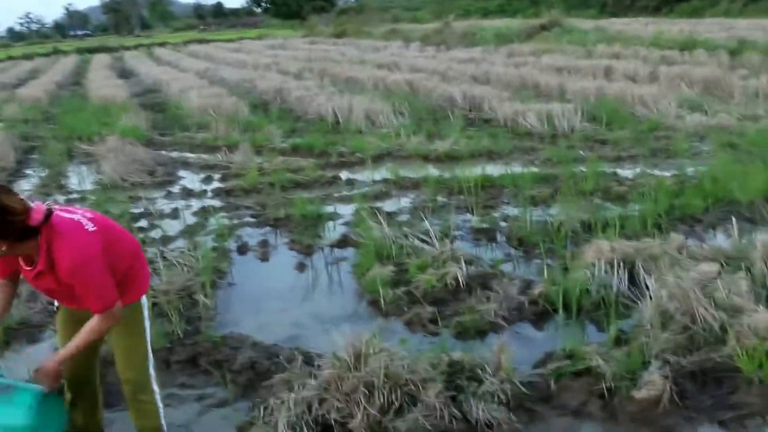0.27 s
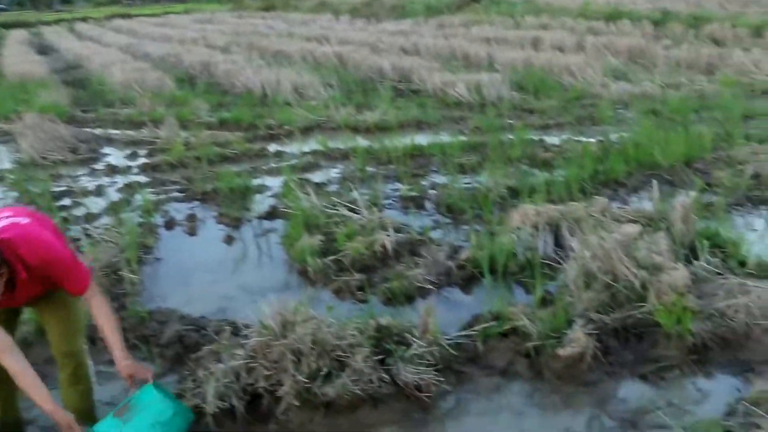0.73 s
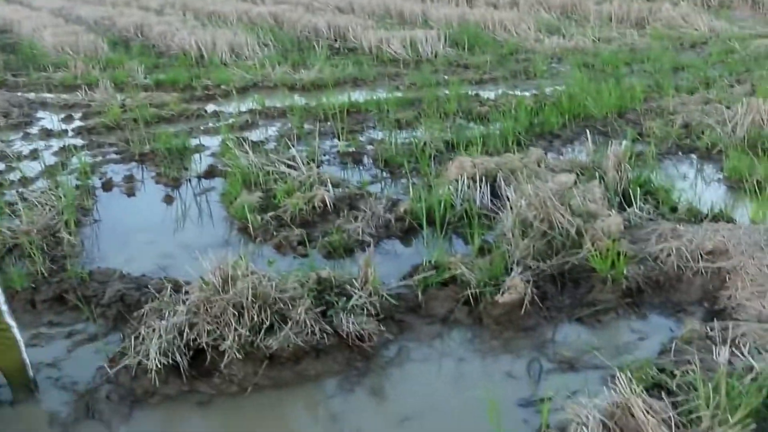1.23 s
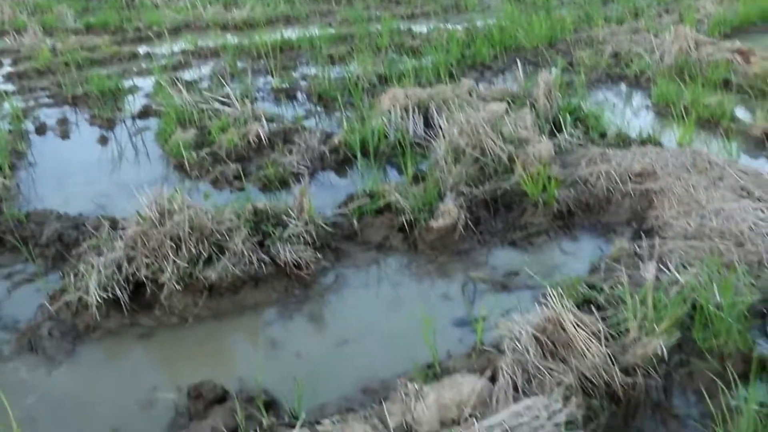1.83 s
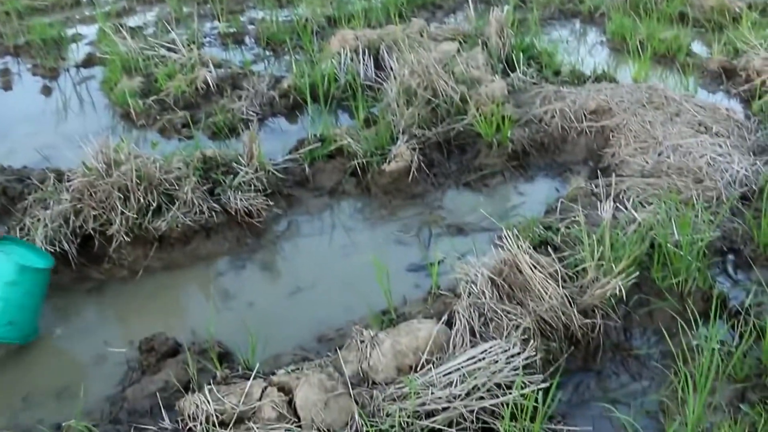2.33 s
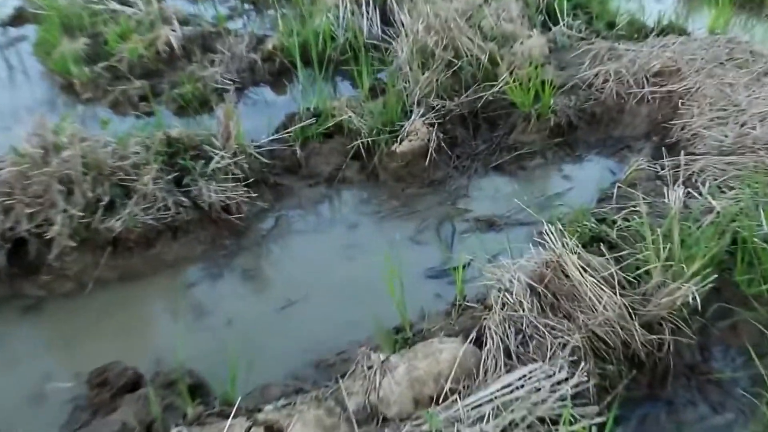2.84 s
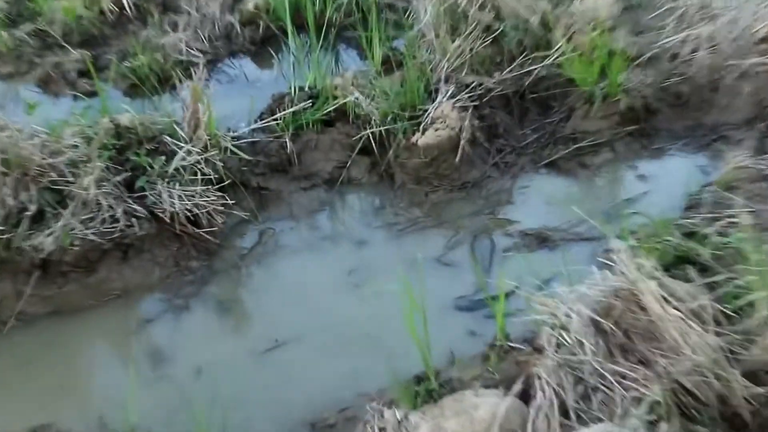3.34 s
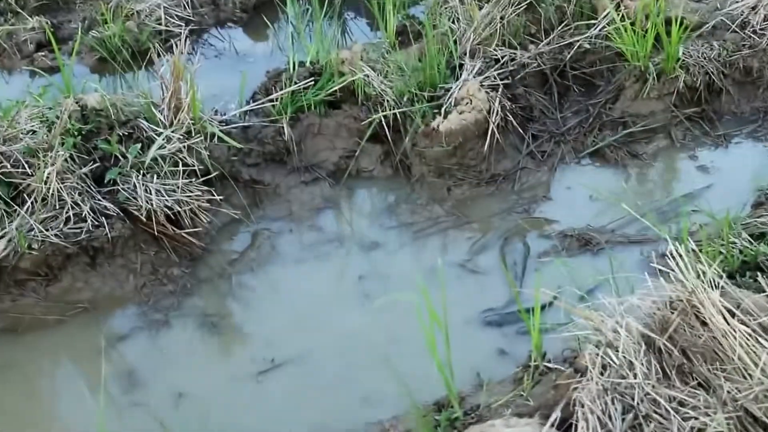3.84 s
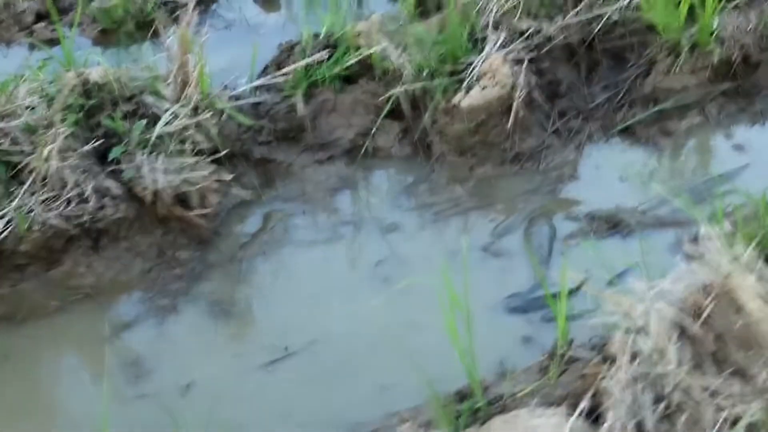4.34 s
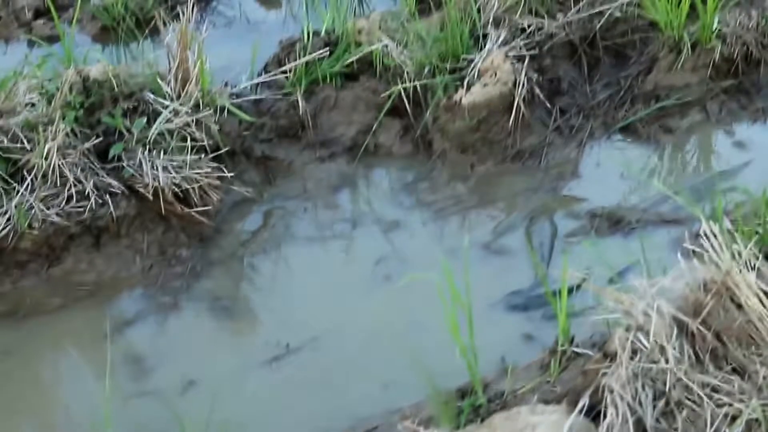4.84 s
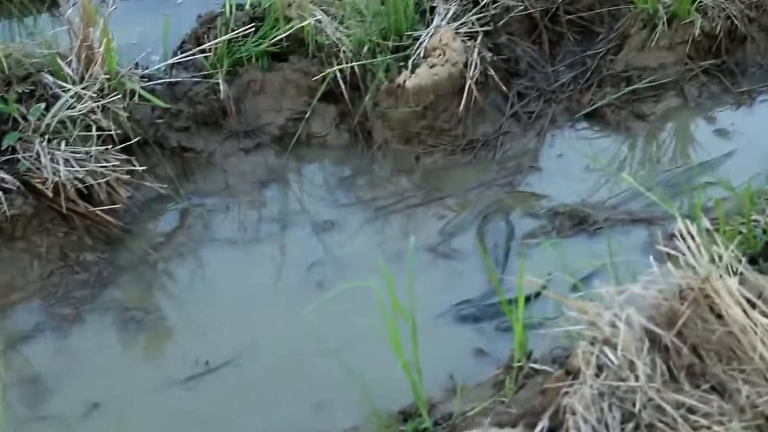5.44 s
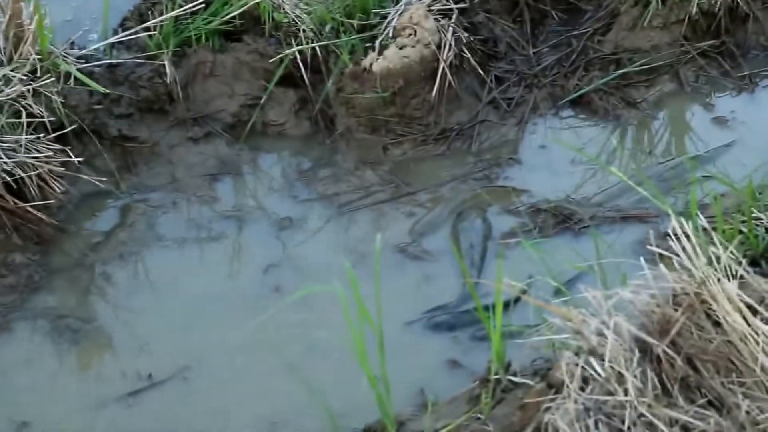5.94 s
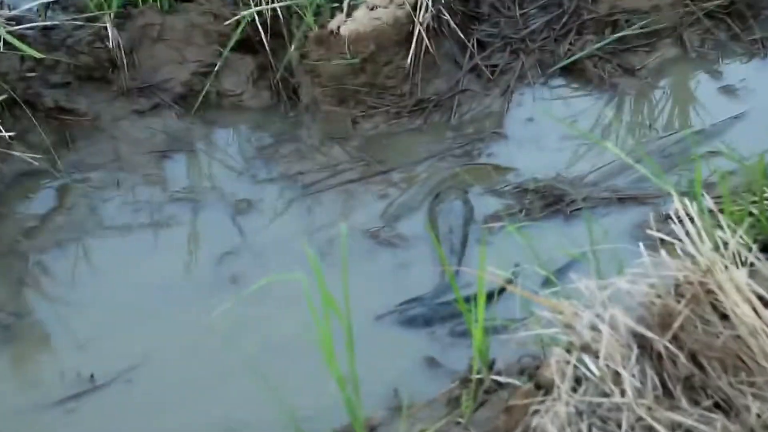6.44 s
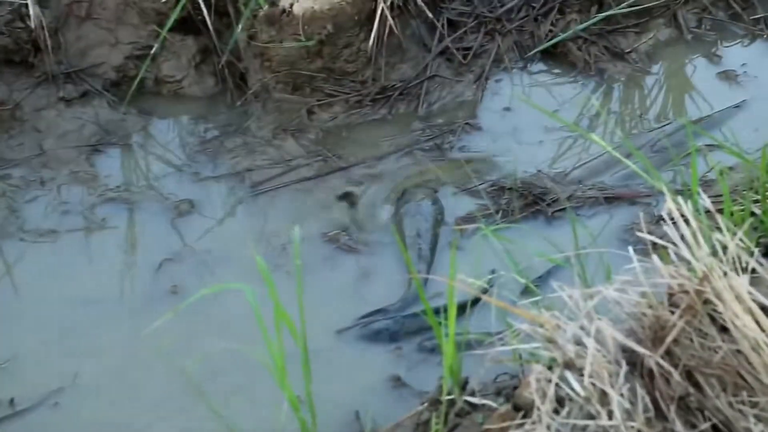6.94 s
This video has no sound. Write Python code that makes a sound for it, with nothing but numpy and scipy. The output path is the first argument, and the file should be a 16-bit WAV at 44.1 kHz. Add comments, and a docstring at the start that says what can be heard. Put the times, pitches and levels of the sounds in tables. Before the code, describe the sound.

Someone bails a shallow muddy pool with a plastic bucket, slightly left of a hand-held microphone in an open field. Hollow knocks and gurgling scoops alternate with flung water landing in splashes about every 1.8 seconds, followed by drips and bubbles. A faint hiss lies beneath. From about three seconds wind thumps grow into strong low rumbling, mostly on the right.

```python
"""A flooded field is bailed with a plastic bucket, a little to the left of a hand-held camera.
A knock opens the scene; a bucketful lands in a splash of noise bursts and bubbles, and trickles off.
The bucket, a bank of damped modes, knocks into the pool, gulps full and flings again about every 1.8 s.
Over a faint hiss a breeze rises from about 3 s: noisy eddies buffet the microphone ports, mostly the right."""
import sys
import numpy as np
from scipy import signal
from scipy.fft import rfft, irfft, next_fast_len
from scipy.io import wavfile
from scipy.ndimage import uniform_filter1d, map_coordinates

SR = 44100
rng = np.random.default_rng(int(sys.argv[2]) if len(sys.argv) > 2 else 0)


def unload_audio(sound):
    """Save the sound as a 16-bit wav file, at the path given as the first command line argument."""
    columns = np.transpose(np.atleast_2d(sound))
    # keep every value between -1 and 1, then stretch to whole-number steps
    steps = np.round(np.clip(columns, -1, 1) * 32767)
    wavfile.write(sys.argv[1], SR, steps.astype(np.int16))


N = 316638

# Steady hiss of field and microphone: f/Hz, relative level/dB
AIR_SPECTRUM = [(30, -5), (150, 9.5), (400, -3), (750, -5.5), (1000, -3), (1250, -16), (3000, -13),
                (5800, -12.5), (7000, -14.5), (8300, -2), (9200, -12), (10200, -9.5), (11300, -27),
                (15500, -43)]
# Faint thin whine, before its wobble: t/s, f/Hz, level/dB
WHINE_PATH = [(0, 1015, -88), (2.8, 1006, -57.5), (3.5, 1009, -70), (5.5, 1064, -50), (6.1, 1053, -64),
              (7.18, 1078, -55.5)]
# The breeze rises; left is before sheltering: t/s, left level/dB, right level/dB
BREEZE_LEVELS = [(0, -72, -61), (2.7, -68, -60), (3.1, -53, -44.5), (4.1, -55, -43.5), (5.4, -43, -26.5),
                 (6.05, -37.5, -37), (7.18, -36.5, -27.5)]
# Gusts, and at 2.557 s the low thud of a bucket knock; t being the start of full strength: t/s, length/s, left
# level/dB, right level/dB
GUSTS_AND_THUD = [(0.086, 0.23, -60, -53), (2.557, 0.033, -49, -53), (2.962, 0.091, -48, -41),
                  (3.51, 0.11, -66, -42), (4.242, 0.11, -65, -38.5), (4.468, 0.29, -44, -35),
                  (4.896, 0.12, -33.5, -26), (5.247, 0.4, -53, -19), (5.693, 0.251, -50, -22.5),
                  (6.256, 0.46, -37.5, -23), (6.75, 0.046, -23, -39), (6.858, 0.3, -32, -29.5)]
# Wind buffeting at a port: f/Hz, relative level/dB
BUFFET_SPECTRUM = [(15, -57), (30, -14.5), (60, 0), (110, 2), (170, -2), (250, -9.5), (340, -14),
                   (500, -26.5), (800, -36.5), (2000, -55), (6000, -93)]
# The hardest eddies on the right port: t/s, peak level/dB, f/Hz
EDDY_THUMPS = [(0.098, -29, 123), (2.978, -24, 165), (3.552, -19, 135), (3.572, -22.5, 168),
               (3.636, -21, 126), (3.897, -19, 101), (3.925, -19.5, 153), (4.27, -16.5, 178),
               (4.306, -15.5, 150), (4.348, -18.5, 95), (4.511, -15, 132), (4.62, -16.5, 156),
               (4.651, -18, 195), (5.126, -13, 209), (5.161, -7.5, 132), (5.185, -9, 196), (5.258, -7, 191),
               (5.292, -5.5, 166), (5.359, -4.5, 203), (5.515, -10.5, 190), (5.566, -5, 151),
               (5.61, -8, 210), (5.688, -7, 128), (5.83, -11.5, 210), (5.93, -12, 170), (5.99, -21, 150),
               (6.05, -23, 170), (6.198, -16, 303), (6.262, -12, 130), (6.31, -12.5, 210), (6.335, -14, 95),
               (6.381, -13, 260), (6.5, -8.5, 245), (6.511, -8.5, 131), (6.546, -16, 298),
               (6.585, -11, 240), (6.605, -12, 170), (6.662, -12, 260), (6.677, -11, 131),
               (6.731, -10.5, 170), (6.884, -20, 277), (6.94, -11, 140), (6.98, -10, 153),
               (7.039, -8.5, 125), (7.125, -8, 149)]
# Dry straw snaps: t/s, peak level/dB
STRAW_SNAPS = [(1.076, -44), (2.099, -24), (2.823, -30), (2.859, -30.5), (6.219, -37)]
# The pool never quite rests: t/s, slosh level/dB
POOL_LEVEL = [(0, -56), (2.6, -54), (4.6, -54.5), (6, -63), (7.18, -81)]
# Single bubbles, gulps and drips: t/s, peak level/dB, f/Hz, t60/s, upward glide/(octaves/s)
SINGLE_BUBBLES = [(.226, -26, 340, 0.027, 4), (.233, -32, 1200, 0.025, 5), (.28, -26, 458, 0.056, 6),
                  (.319, -23.5, 990, .04, 3), (.36, -32, 400, 0.047, 10), (0.53, -30.5, 903, 0.08, 12),
                  (1.043, -33, 274, 0.056, 4), (1.069, -33, 310, 0.038, 3), (1.134, -38, 197, 0.078, -3),
                  (1.141, -43, 2300, .03, 9), (1.174, -42, 4080, .016, 3), (1.186, -43, 402, 0.11, -4),
                  (1.235, -38, 2400, 0.035, 8), (1.287, -43, 890, 0.04, 19), (1.352, -33, 371, 0.043, 8),
                  (1.399, -28, 316, 0.045, 5), (1.44, -34, 151, 0.09, 0), (1.461, -34, 2320, 0.033, 4.5),
                  (1.508, -34, 134, 0.12, -1.5), (1.638, -32, 3900, 0.018, 3), (2.025, -39, 1120, 0.028, 5),
                  (2.106, -30, 1210, .03, 6), (2.865, -25, 266, 0.047, 6), (2.872, -36, 960, 0.044, -1.5),
                  (2.892, -32.5, 1900, .03, 25), (2.971, -26.5, 348, .045, 10),
                  (3.042, -18, 298, 0.045, 15), (3.047, -32, 993, 0.035, 8), (3.088, -32, 352, .035, 6),
                  (3.159, -31, 1950, 0.027, 26), (3.182, -46, 1020, 0.036, 3),
                  (3.212, -39.5, 1460, 0.034, 10), (3.287, -42, 2270, .06, 0), (3.312, -37, 778, 0.11, 10),
                  (3.44, -44, 1337, 0.063, 8.5), (3.616, -42, 1340, 0.028, 4),
                  (3.723, -22.5, 1060, .025, 13), (3.765, -25.5, 463, 0.047, 6),
                  (3.976, -40, 2040, .025, 7), (4.003, -41, 1020, 0.038, 11),
                  (4.072, -36, 1890, 0.027, 26.5), (4.436, -43, 930, 0.03, 3), (4.463, -36, 800, 0.039, 15),
                  (4.664, -40, 2170, .03, 12), (4.832, -36.5, 800, .06, 33), (4.84, -37, 1163, .04, 6),
                  (4.882, -42, 1210, 0.032, 21), (4.897, -36, 2800, 0.034, 1),
                  (4.921, -24.5, 340, 0.067, 2), (4.961, -33.5, 1360, 0.031, 12),
                  (5.092, -35.5, 820, 0.055, 14), (5.191, -39, 1090, 0.028, 23),
                  (5.494, -28, 1150, 0.045, 2), (5.822, -41, 690, 0.025, 17),
                  (6.189, -36.5, 897, 0.056, 10.5), (6.26, -40, 1750, 0.03, 7),
                  (6.305, -36, 1137, 0.032, 33), (6.329, -45, 1690, 0.036, 25),
                  (6.533, -34.5, 953, 0.041, 8), (6.625, -30.5, 1160, 0.047, -8.5),
                  (6.66, -31.5, 980, .08, 2.5), (6.678, -30, 932, 0.041, 11.5),
                  (6.718, -41, 1940, 0.04, 11), (6.789, -44, 863, 0.071, 7), (6.845, -44, 996, 0.032, 7),
                  (6.97, -36, 1144, 0.033, 18.5)]
# Bucket knocks, colours before a fixed offset: t/s, peak level/dB, low thud/dB, rim tick/dB
BUCKET_KNOCKS = [(0.078, -25.5, -25, -27), (0.926, -8, -17, -12), (1.225, -42.5, 1.5, 7),
                 (1.587, -14.5, -24.5, -13.5), (2.553, -15.5, -17, -16.5), (3.351, -18, -24.5, -20),
                 (4.412, -14.5, -16, -20), (5.151, -20, -19.5, -18), (5.35, -17.5, -19, -11)]
# Bucket modes, before the colour and scatter of each knock: f/Hz, level/dB, swell time/s
BUCKET_MODES = [(314, 0.5, 0.0054), (477, 2.5, 0.0029), (714, -15, 0.0015), (976, -10, 0.0066),
                (1240, -8, 0.0017), (2040, -24, 0.0019), (2067, -11, 0.0014), (2490, -8.5, 0.0023),
                (3490, -24, 0.0033), (4300, -3, 0.0008)]
# The bucket is drawn through the pool:
# t/s, rise/s, swell/dB, slosh level/dB, spray level/dB, gurgle level/dB, t60/s
SCOOP_EVENTS = [(.78, 0.55, 11, -52, -49, -48, 1.2), (1.24, 0.14, 18, -38, -47, -46.5, 0.48),
                (2.86, 0.18, 12, -36.5, -42, -44, 1.26), (4.661, 0.22, 7, -40.5, -49, -47, 0.78),
                (6.16, 0.78, 2.5, -49.5, -53.5, -49, 0.3)]
# A bucketful is flung out and lands: t/s, rise/s, slosh swell/dB, slosh level/dB, spray level/dB, t60/s,
# leading spray level/dB, stragglers' delay/s, stragglers' level/dB
THROW_EVENTS = [(0.197, 0.089, 20.5, -23, -29, 0.34, -52, 0.33, -43),
                (1.82, 0.11, 20, -28.5, -32, 0.39, -41, 0.2, -38),
                (3.685, 0.095, 25, -21.5, -29, 0.29, -41, 0.25, -45),
                (5.188, 0.425, 12.5, -30.5, -38.5, 0.17, -51.5, 0.095, -42.5),
                (7.095, 0.18, 7, -33.5, -34.5, 0.27, -77, .25, -42)]
# Sheets of water landing within a rush: t/s, half length/s, slosh level/dB, spray level/dB
WATER_SHEETS = [(0.23, 0.026, -31, -36.5), (1.977, 0.036, -32, -33.5), (3.729, 0.022, -30.5, -38),
                (3.81, 0.019, -36, -30.5), (4.904, 0.02, -57, -48), (5.31, 0.058, -35, -46),
                (5.559, 0.026, -38, -34), (5.607, 0.0072, -42, -32), (7.17, 0.012, -31, -39.5)]
# The heaviest slaps of water on water and mud: t/s, peak level/dB, centre f/Hz, t60/s
WATER_SLAPS = [(.202, -16.5, 1300, 0.055), (.226, -24, 2200, 0.06), (.277, -5, 3200, 0.033),
               (.298, -13, 935, 0.19), (.583, -27, 1400, .025), (.882, -21, 3700, .05),
               (1.078, -16.5, 2840, 0.048), (1.225, -18, 2240, 0.055), (1.332, -24.5, 990, 0.086),
               (1.375, -24, 1400, 0.055), (1.402, -19, 1070, 0.073), (1.5, -21, 1150, 0.07),
               (1.826, -18, 2600, 0.079), (1.873, -24, 1100, .07), (1.884, -16, 1200, 0.09),
               (1.948, -12.5, 1820, 0.16), (1.965, -12, 2300, 0.073), (1.982, -16.5, 1400, 0.073),
               (2.083, -27, 1240, 0.067), (2.116, -19, 1900, .04), (2.175, -22, 1270, 0.15),
               (2.392, -28.5, 2290, 0.06), (2.866, -21, 900, 0.084), (2.932, -26, 1010, 0.032),
               (3.039, -18, 1300, 0.063), (2.975, -26, 1500, .09), (3.094, -29, 800, .05),
               (3.16, -30, 2000, .03), (3.495, -21, 2910, 0.032), (3.605, -24, 1600, 0.029),
               (3.767, -6.5, 1180, 0.072), (3.778, -4.5, 1140, 0.064), (3.784, 1, 1180, 0.022),
               (3.797, -10, 1210, 0.047), (4.059, -24, 1330, 0.068), (4.465, -23, 895, 0.076),
               (4.722, -20.5, 2020, 0.04), (4.801, -22, 2500, 0.06), (4.884, -34, 1700, 0.05),
               (5.012, -25.5, 1430, 0.074), (5.291, -14, 1790, 0.058), (5.351, -15, 1310, 0.11),
               (5.425, -22, 750, 0.12), (5.481, -20, 720, 0.17), (5.514, -16, 750, 0.092),
               (5.555, -9, 2070, 0.093), (5.574, -9.5, 2010, 0.044), (5.594, -21, 690, 0.086),
               (5.689, -20.5, 1330, 0.12), (5.719, -22.5, 1450, 0.3), (6.187, -26, 1440, 0.082),
               (6.217, -22.5, 2240, 0.065), (6.482, -31, 2600, 0.11), (6.504, -30, 1500, 0.05),
               (6.52, -23.5, 2200, 0.056), (6.306, -26, 1300, .03), (6.626, -25, 1200, .035),
               (6.645, -26.5, 1900, 0.078), (6.672, -28, 2860, 0.099), (6.791, -28, 1140, .045),
               (6.971, -27, 1240, 0.026), (7.1, -13.5, 1900, 0.036)]
# Slosh of landing water: f/Hz, relative level/dB per Hz
SLOSH_SPECTRUM = [(60, -25), (170, -17.5), (320, -5), (480, -4.5), (640, -9), (800, -6), (1020, -1),
                  (1350, -1.5), (1730, -10), (2080, -3), (2400, -5.5), (2700, -4.5), (3050, -10),
                  (3400, -6.5), (4600, -15), (8000, -29)]
# Fine spray, also used for straw: f/Hz, relative level/dB per Hz
SPRAY_SPECTRUM = [(800, -19), (2500, -4.5), (3600, -8), (4600, 0.5), (5600, -4), (7000, 1), (9500, -4),
                  (12000, -7.5), (15500, -15)]
# Droplets crackling on the water: f/Hz, relative level/dB
SPATTER_SPECTRUM = [(300, -15), (1050, -2.5), (1400, 5), (1720, -7), (2100, 1), (2700, -7.5), (3050, 3),
                    (3400, 2.5), (4600, -3), (9000, -1), (15500, -10)]
# Likeness of the two channels: f/Hz, left-right likeness (1 = same)
CHANNEL_LIKENESS = [(200, 1), (1200, 0.75), (2500, 0.58), (5000, 0.53), (8000, 0.62), (11000, 0.53),
                    (15000, 0.24)]
# The camera body shades the ports: f/Hz, left minus right level/dB
PORT_SHADE = [(200, -2.5), (700, -2), (1100, -1), (2000, 0), (2700, 0), (3500, 1), (8000, -1.5), (13000, 3)]

TOP_HZ = 15800  # band limit
GUST_RISE_S, GUST_FALL_S = 0.11, 0.018  # before and after a gust's full strength
SHELTER_HZ = 330  # the lee port loses the small, quick eddies above this
LEAD_S, LEAD_SWELL_DB = 0.256, 8.5  # loose drops fly ahead of the mass of water
# The last of the water lands and runs off; its spray is set against its slosh
STRAGGLE_SWELL_DB, STRAGGLE_T60_S, STRAGGLE_SPRAY_DB = 5, 0.81, -1
POOL_SPRAY_DB, THROW_GURGLE_DB = -57.5, -16.5  # faint pool fizz; gurgle of a landing against its slosh
SPRAY_SWELL = 0.48  # in a throw, the spray's swell in dB as a share of the slosh's
ATTACK_SHARE = 0.032  # water sets in over this share of its rise
SETTLE_S, DRIP_GROWTH = 0.041, 0.75  # smoothing of the stirred pool; drips grow by this power of it
SPATTER_DB = -6.5  # crackling droplets, against the plash
BUBBLE_HOLD = 1.75  # a bubble holds its ring at first: the fall in dB goes with this power of time
CHURN_DB = -10  # churning water, against its bubble
FOAM_DB, RIPPLE_DB = -5.5, -5.5  # bubbles against a plash; gliding notes against a deep gurgle


def amp(db):
    """Decibels to gain."""
    return np.exp(np.asarray(db) * (np.log(10) / 20))


def unit(x):
    """Scale to rms 1."""
    return x / np.sqrt(np.mean(x ** 2) + 1e-20)


def along(points, hz):
    """Read (Hz, value) points on a log frequency axis."""
    f, v = np.transpose(points)
    return np.interp(np.log(hz + 1), np.log(f + 1), v)


def curves(rows):
    """One value per sample for each column after the time."""
    s, *cols = np.transpose(rows)
    now = np.arange(N) / SR
    return [np.interp(now, s, c) for c in cols]


def wobble(rate):
    """A smooth random curve with rate knots a second."""
    knots = rng.standard_normal(int(N * rate / SR) + 4)
    return map_coordinates(knots, [np.arange(N) * rate / SR])


def filtered(x, response):
    """Shape x by a complex response of frequency."""
    m = next_fast_len(N + SR // 2)
    return irfft(rfft(x, m) * response(np.fft.rfftfreq(m, 1 / SR)), m)[..., :N]


def coloured(x, spectrum):
    """Shape x by a (Hz, dB) spectrum, at rms 1."""
    return unit(filtered(x, lambda hz: amp(along(spectrum, hz))))


def add(track, s, sound):
    """Mix a sound into the track at time s."""
    i = max(0, round(s * SR))
    track[i:i + len(sound)] += sound[:max(0, N - i)]


def drops(rate, spread_db):
    """Random impulses, many small and a few large, at rms 1."""
    count = int(rate * N / SR)
    size_db = spread_db * np.minimum(rng.exponential(size=count), 3)
    size = amp(size_db) * rng.choice([-1, 1], count)
    return unit(np.bincount(rng.integers(0, N, count), size, N))


def rush(t, centre_hz, octaves):
    """A short piece of noise in a broad hump around a pitch, at rms 1."""
    hz = np.fft.rfftfreq(len(t), 1 / SR) + 1
    hump = 1 / (1 + (np.log2(hz / centre_hz) / octaves) ** 2) ** 1.5
    return unit(irfft(rfft(rng.standard_normal(len(t))) * hump, len(t)))


def lumpy(x, depth_db):
    """Each lump of water stresses its own pitches for a few hundredths of a second."""
    z = signal.stft(x, nperseg=1024)[2]
    field = uniform_filter1d(rng.standard_normal(z.shape), size=4, axis=0)  # smooth over frequency
    field = uniform_filter1d(field, size=3, axis=1)  # smooth over time
    stress = amp(depth_db * np.clip(unit(field), -2, 2))
    return unit(signal.istft(z * stress, nperseg=1024)[1][:N])


def bubble(t, hz, t60, glide):
    """A trapped air pocket rings, and glides in pitch (octaves/s), as when it rises to the surface."""
    turns = np.cumsum(hz * 2 ** np.minimum(glide * t, 1), axis=-1) / SR
    decay = amp(-60 * (t / t60) ** BUBBLE_HOLD)
    return np.sin(2 * np.pi * turns) * decay * (1 - np.exp(-t * hz))


def froth(rate, centre_hz, octaves, cycles, spread_db, rise):
    """A cloud of bubbles of scattered size and life, at rms 1; each climbs by about rise octaves."""
    count = int(rate * N / SR)
    t = np.arange(SR // 22) / SR
    when, pitch, strength, life, climb = rng.random((count, 5)).T[..., None]
    scatter = octaves * .55 * np.log(pitch / (1 - pitch))  # bell-shaped, in octaves
    hz = np.clip(centre_hz * 2 ** scatter, 200, 7000)
    size = amp(spread_db * np.minimum(-np.log(strength), 3))  # many small, a few large
    t60 = np.minimum(cycles / hz * (.5 + life), t[-1])
    t = t[t <= t60.max()]
    rings = size * bubble(t, hz, t60, 2 * climb * rise / t60)
    at = (when * N).astype(int) + np.arange(len(t))
    return unit(np.bincount(at.ravel(), rings.ravel(), N)[:N])


def widened(mid, side):
    """Two unrelated sounds become a pair whose likeness varies with frequency."""
    turn = lambda hz: np.arccos(np.clip(along(CHANNEL_LIKENESS, hz), -1, 1)) / 2
    shares = lambda hz: np.array([np.cos(turn(hz)), np.sin(turn(hz))])
    mid, side = filtered(np.array([mid, side]), shares)
    return np.array([mid + side, mid - side])


def from_left(x):
    """Sound from the left reaches the left port first, and the camera body shades the ports."""
    lead = 4 / SR  # s between the ports

    def half(hz):  # half the log gain and half the delay for each port
        return along(PORT_SHADE, hz) / 2 * np.log(10) / 20 + 1j * np.pi * hz * lead

    return filtered(x, lambda hz: np.exp([half(hz), -half(hz)]))


def air():
    """The steady faint hiss of the field and the microphone, with a thin wavering whine in it."""
    hz, db = curves(WHINE_PATH)
    turns = np.cumsum(hz + 12 * wobble(40)) / SR
    whine = amp(db + 1.5 * wobble(39)) * np.sin(2 * np.pi * turns)
    hiss = widened(*coloured(rng.standard_normal((2, N)), AIR_SPECTRUM))
    return amp(-50.5) * hiss + whine


def wind():
    """Gusts, and one knock's low thud, ride on the breeze. Eddies buffet each port separately; a strong one is
    a push and pull."""
    now = np.arange(N) / SR
    power = amp(curves(BREEZE_LEVELS)) ** 2
    for start, length, left_db, right_db in GUSTS_AND_THUD:
        ramp = np.minimum((now - start) / GUST_RISE_S, (start + length - now) / GUST_FALL_S)
        gust = np.clip(1 + ramp, 0, 1)
        power = power + (amp([[left_db], [right_db]]) * gust) ** 2

    def eddies():
        surges = amp(3.6 * np.tanh(wobble(55)) + 2.85 * np.tanh(wobble(16)))
        rough = drops(rate=280, spread_db=2.5) + 0.72 * rng.standard_normal(N)
        return coloured(rough * surges, BUFFET_SPECTRUM)

    left, right = np.sqrt(power) * [eddies(), eddies()]
    left = filtered(left, lambda hz: 1 / np.hypot(1, (hz / SHELTER_HZ) ** 2))
    t = np.arange(-SR // 40, SR // 40) / SR
    for s, db, hz in EDDY_THUMPS:  # each eddy meets the port at a phase of its own
        push = np.sin(2 * np.pi * (hz * t + rng.random())) / np.cosh(3.9 * hz * t)
        add(right, s + t[0], amp(db) * push)
    return np.array([left, right])


def straw():
    """Dry stubble snaps with a tiny bright click: a quick burst of noise."""
    t, strength = np.arange(SR // 20) / SR, np.zeros(N)
    for s, db in STRAW_SNAPS:
        add(strength, s, amp(db - 60 * t / 0.02))
    return strength * widened(*coloured(rng.standard_normal((2, N)), SPRAY_SPECTRUM))


def trickle(slosh):
    """Single small drips plink while the stirred water settles."""
    keep = np.exp(-1 / (SETTLE_S * SR))
    stirred = signal.lfilter([1 - keep], [1, -keep], slosh) ** DRIP_GROWTH
    drips = froth(rate=110, centre_hz=2300, octaves=0.6, cycles=28, spread_db=3.5, rise=.2)
    return amp(-26.5) * stirred * drips


def gulps(gurgle):
    """Single bubbles, and a gurgle of deep and gliding ones as the bucket fills and the pool closes."""
    t, out = np.arange(SR // 6) / SR, np.zeros(N)
    for s, db, hz, t60, glide in SINGLE_BUBBLES:
        churn = amp(CHURN_DB - 90 * t / t60) * rush(t, 1.5 * hz, octaves=0.87)  # water pinching it off
        add(out, s, amp(db) * (bubble(t, hz, t60, glide) + churn))
    deep = froth(rate=120, centre_hz=373, octaves=0.4, cycles=6, spread_db=3, rise=.25)
    ripples = froth(rate=60, centre_hz=1150, octaves=.4, cycles=24, spread_db=2.5, rise=.35)
    waver = 1 + .2 * wobble(300)
    return out * waver + gurgle * (deep + amp(RIPPLE_DB) * ripples)


def bucket():
    """Each knock swells in the hollow bucket and is quickly damped by the water that it slaps."""
    t, out = np.arange(SR // 8) / SR, np.zeros(N)
    for s, db, thud_db, tick_db in BUCKET_KNOCKS:
        ring = amp(-4.0 + tick_db / 3 - 60 * t / 0.052) * rush(t, 1440, octaves=0.69)  # the wet slap
        ring += amp(-2.5 + tick_db - 60 * t / 0.026) * rush(t, 4100, octaves=0.18)  # the rim cracks
        colour = [(500, thud_db + 7.5), (900, 0), (1250, 0), (1700, tick_db + 4.0)]  # (Hz, dB)
        for hz, level_db, swell in BUCKET_MODES:
            u = t / swell
            tail = .03 * (1 - np.exp(-u)) * amp(-60 * t / .18)
            shape = (u * np.exp(1 - u)) ** 2 + tail
            pitch = hz * (1 + rng.normal(0, 0.034))  # the load of water differs each time
            gain = amp(level_db + along(colour, hz) + rng.normal(0, 1))
            ring += gain * shape * np.sin(2 * np.pi * (pitch * t + rng.random()))
        ring += amp(-17.0 - 60 * t / 0.1) * rush(t, 670, octaves=0.99)  # water slops back on the wall
        ring += amp(-19 - 60 * t / 0.18) * rush(t, 980, octaves=0.19)  # its trapped bubbles ring on
        add(out, s, amp(db - 1.5) * ring * (1 - np.exp(-t * 1000)))
    return out


def surge(start, rise, swell_db, t60):
    """Gain of a rush of water: it sets in, swells to 1 and dies away."""
    t = np.arange(N) / SR - start
    db = -swell_db * np.clip(1 - t / rise, 0, 1) - 60 * np.maximum(t - rise, 0) / t60
    return amp(db) * np.clip(t / (ATTACK_SHARE * rise), 0, 1)


def water():
    """Gains of slosh, spray and gurgle; the powers of pool, throws, scoops and sheets add up."""
    slosh = [amp(curves(POOL_LEVEL)[0])]
    spray = [np.full(N, amp(POOL_SPRAY_DB))]
    gurgle = []
    for start, rise, swell_db, slosh_db, spray_db, t60, lead_db, delay, late_db in THROW_EVENTS:
        mass = amp(slosh_db) * surge(start, rise, swell_db, t60)
        mist = amp(spray_db) * surge(start, rise, SPRAY_SWELL * swell_db, t60)
        lead = amp(lead_db) * surge(start - LEAD_S, LEAD_S, LEAD_SWELL_DB, t60)
        late = amp(late_db) * surge(start + rise, delay, STRAGGLE_SWELL_DB, STRAGGLE_T60_S)
        slosh += [mass, late]
        spray += [mist, lead, amp(STRAGGLE_SPRAY_DB) * late]
        gurgle.append(amp(THROW_GURGLE_DB) * mass)
    for start, rise, swell_db, slosh_db, spray_db, gurgle_db, t60 in SCOOP_EVENTS:
        flow = surge(start, rise, swell_db, t60)
        slosh.append(amp(slosh_db) * flow)
        spray.append(amp(spray_db) * flow)
        gurgle.append(amp(gurgle_db) * flow)
    for s, half, slosh_db, spray_db in WATER_SHEETS:
        landing = np.exp(-.5 * ((np.arange(N) / SR - s) / half) ** 2)
        slosh.append(amp(slosh_db) * landing)
        spray.append(amp(spray_db) * landing)
    return [np.linalg.norm(layer, axis=0) for layer in (slosh, spray, gurgle)]


def slaps():
    """A lump of water lands with a short burst of noise around its own pitch."""
    t, out = np.arange(SR // 8) / SR, np.zeros(N)
    for s, db, hz, t60 in WATER_SLAPS:
        add(out, s, amp(db - 14 - 60 * t / t60) * rush(t, hz, octaves=0.66))  # 14 dB from peak to rms
    return out


def splashes(slosh, spray):
    """Lumps of water plash and trap bubbles; droplets crackle and tick, and fine spray patters."""
    lumps = wobble(50)  # the sheet of water tears into lumps

    def plash():
        patter = drops(rate=1600, spread_db=3) + .25 * rng.standard_normal(N)
        return coloured(lumpy(patter, depth_db=4.6), SLOSH_SPECTRUM)

    def droplets():
        crackle = froth(rate=220, centre_hz=2600, octaves=.75, cycles=4, spread_db=4, rise=.2)
        return coloured(crackle, SPATTER_SPECTRUM)

    def fizz():  # fine spray on mud and straw
        patter = drops(rate=1100, spread_db=5) + .6 * rng.standard_normal(N)
        return coloured(lumpy(patter, depth_db=2.5), SPRAY_SPECTRUM)

    foam = froth(rate=220, centre_hz=1900, octaves=.7, cycles=26, spread_db=3, rise=.2)
    foam = amp(FOAM_DB) * coloured(foam, SLOSH_SPECTRUM)
    spatter = amp(SPATTER_DB) * widened(droplets(), droplets())
    body = unit(widened(plash(), plash()) + foam + spatter)
    splats = amp(2 * np.tanh(wobble(170)))
    ticks = froth(rate=120, centre_hz=3413, octaves=0.5, cycles=106, spread_db=2.0, rise=0.13)
    mist = amp(0.44 + 1.3 * lumps + 0.42 * wobble(150)) * widened(fizz(), fizz())
    return slosh * amp(1.6 * lumps) * splats * body + spray * (mist + amp(-6.0) * ticks)


def scene():
    """The bailing comes from the left, in open air; the wind acts on the ports themselves."""
    slosh, spray, gurgle = water()
    field = air() + straw()
    pool = trickle(slosh) + gulps(gurgle)
    bailing = bucket() + slaps() + splashes(slosh, spray)
    return from_left(field + pool + bailing) + wind()


def record(dry):
    """The camera keeps nothing above its band limit."""
    return filtered(dry, lambda hz: hz < TOP_HZ)


dry = scene()
out = record(dry)
unload_audio(out)
```